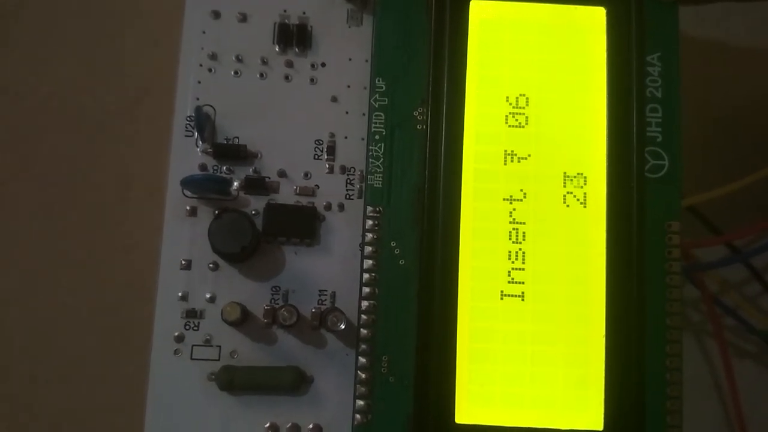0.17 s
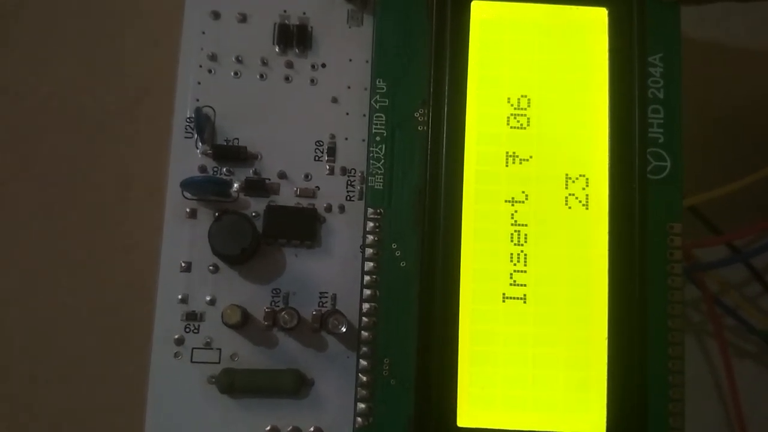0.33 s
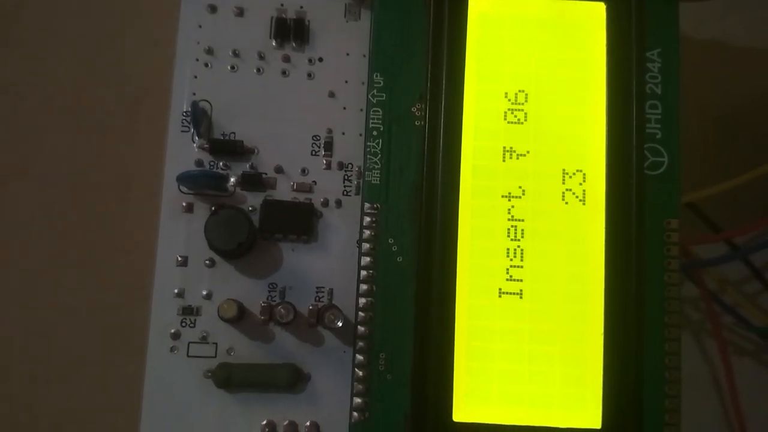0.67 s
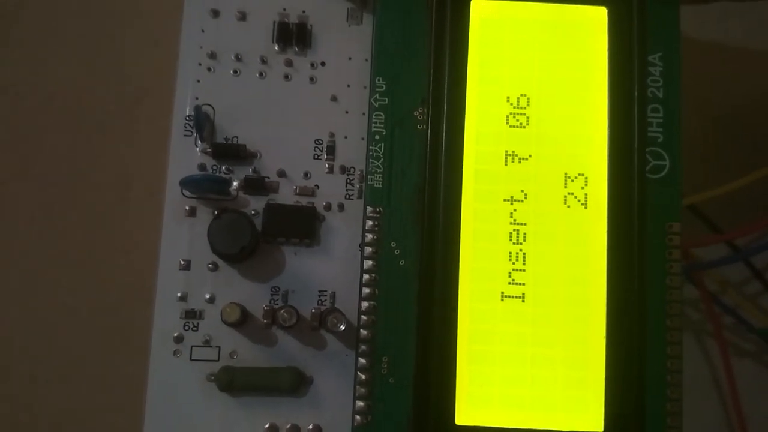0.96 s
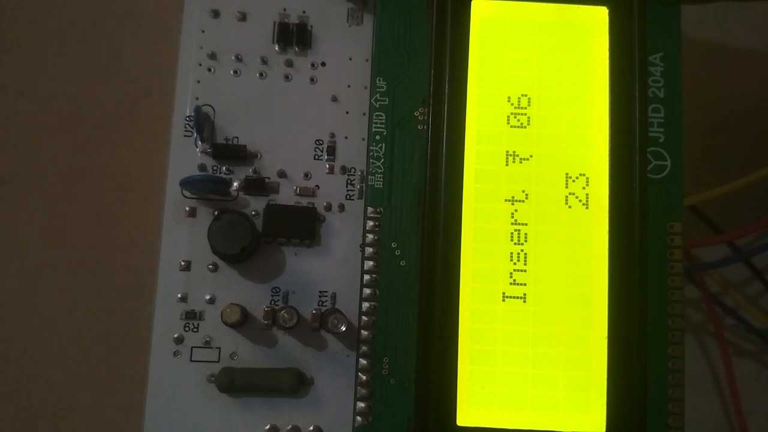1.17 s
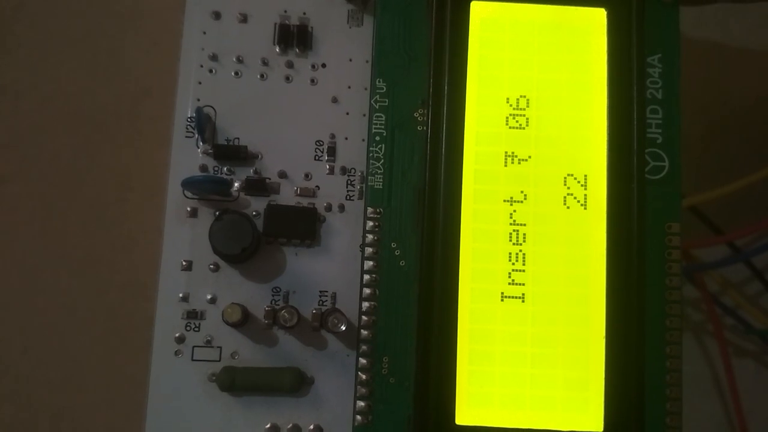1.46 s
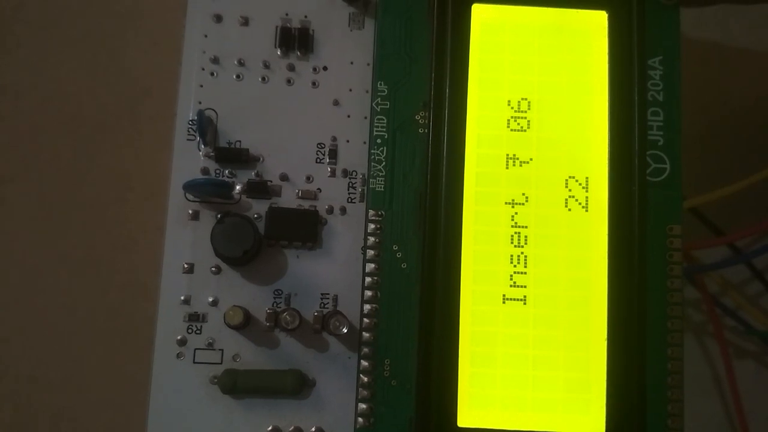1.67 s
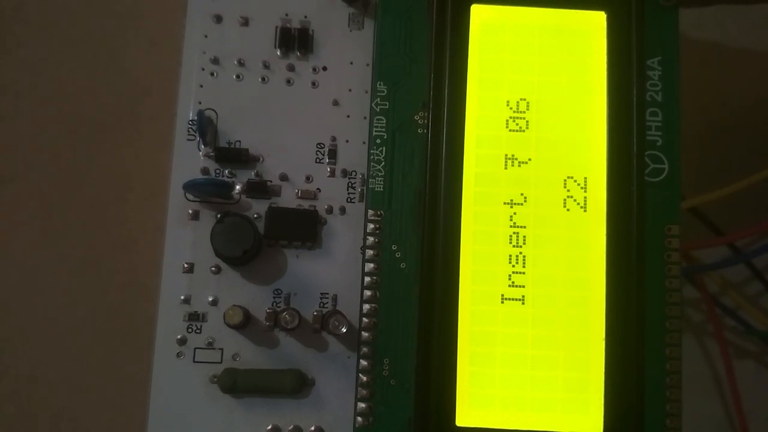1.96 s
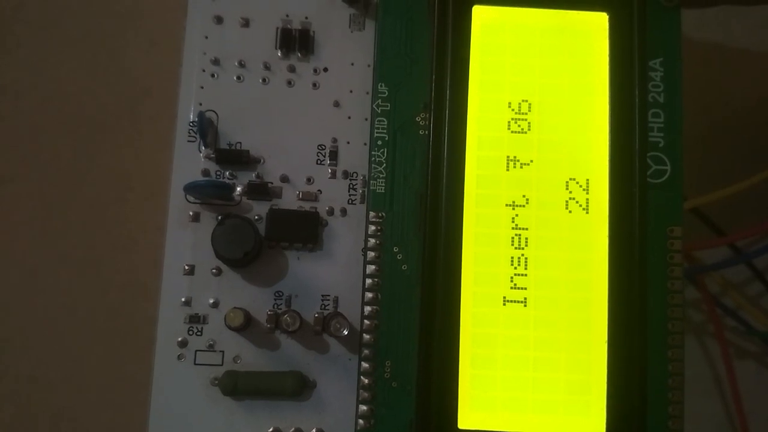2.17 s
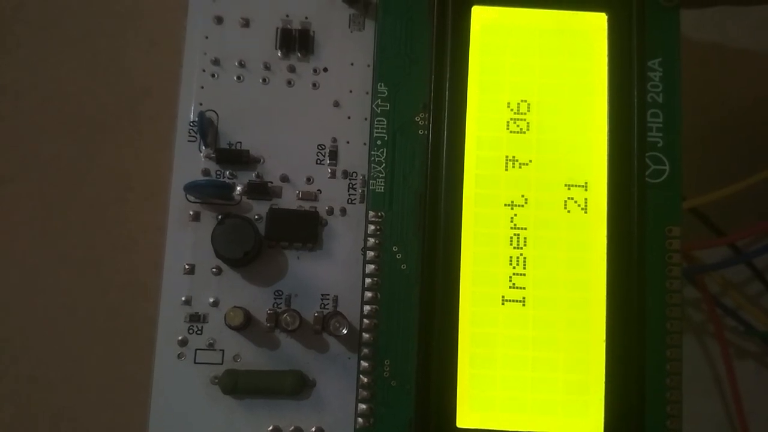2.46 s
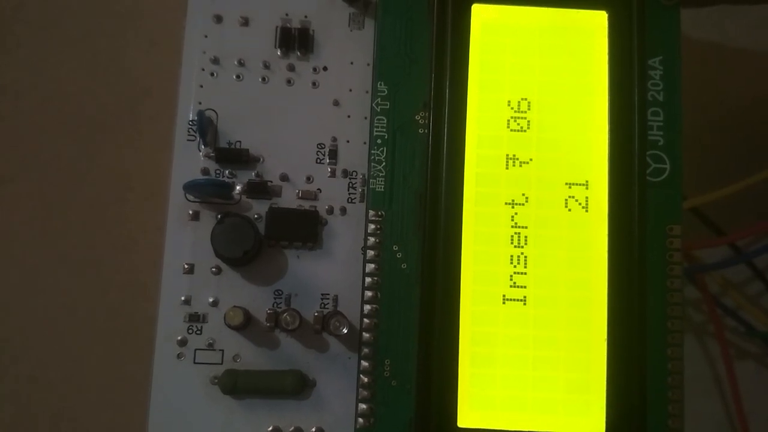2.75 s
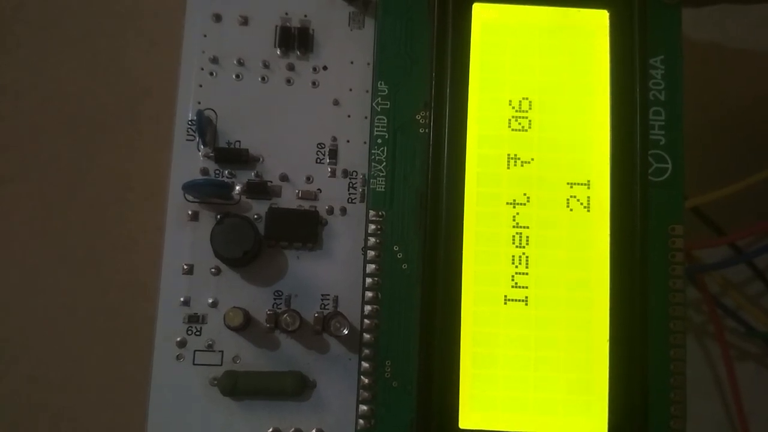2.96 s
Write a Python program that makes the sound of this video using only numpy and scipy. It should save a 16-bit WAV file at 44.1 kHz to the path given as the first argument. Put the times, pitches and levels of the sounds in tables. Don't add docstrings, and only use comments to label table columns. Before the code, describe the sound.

Coin drops through a small metal machine, sparse clicks becoming loud rattling knocks over a faint low hum

```python
import sys
import numpy as np
from scipy import signal
from scipy.io import wavfile
from scipy.ndimage import uniform_filter1d

SR = 44100
rng = np.random.default_rng(int(sys.argv[2]) if len(sys.argv) > 2 else 0)


def unload_wav(signal):
    wavfile.write(
        sys.argv[1],
        SR,
        np.round(np.clip(np.atleast_2d(signal).T, -1, 1) * 32767).astype(np.int16),
    )


def field_ratio(decibels):
    return 10 ** (np.asarray(decibels, dtype=float) / 20)


N = 136710

# f/Hz, level/dB, t60/s
CHUTE_MODES = [(4120, -14.5, 0.0085), (5182, -5, 0.0073), (5643, -9.5, 0.048), (7166, -13, 0.019),
               (8460, -17.5, 0.012)]
# f/Hz, level/dB, t60/s
COIN_MODES = [(8400, -2, .012), (9900, -2, .012), (11100, -1, .014), (12300, -2, .01), (13450, -1, .012),
              (14700, -2, .01)]
# f/Hz, level/dB, t60/s
FLAP_MODES = [(1800, 5, .02), (2650, 1, .025), (3050, 2, .03), (3850, -2, .03), (5050, -7, .025),
              (5350, -4, .03)]
DETUNE = 0.035
CABINET_APART = .3
LEFT_RIGHT = np.array([[1], [-1]])


def evened(x):
    return x / np.sqrt(np.mean(x ** 2) + 1e-20)


def read(points, hz):
    f, value = np.transpose(points)
    return np.interp(np.log(hz + 1), np.log(f + 1), value)


def add(mix, s, sound):
    part = mix[:, round(s * SR):][:, :sound.shape[1]]
    part += sound[:, :part.shape[1]]


def band(x, lo_hz, hi_hz):
    return signal.sosfilt(signal.butter(3, [lo_hz, min(hi_hz, 20000)], "band", fs=SR, output="sos"), x)


def resonate(x, hz, width):
    turn = np.exp(2j * np.pi * np.cumsum(hz) / SR)
    r = np.exp(-np.pi * width / SR)
    return (turn * signal.lfilter([1], np.convolve([1, -r], [1, -r]), x / turn)).real


def air():
    # f/Hz, level/dB
    colour = [(25, -28.5), (50, -10.5), (165, 0.5), (250, -9), (330, -24.5), (1400, -33), (2300, -53),
              (9500, -58.5)]
    # f/Hz, correlation
    likeness = [(60, 0.77), (240, 0.73), (950, 0.12), (3770, 0.16), (15000, -0.043)]
    level_db, patch_db, hiss_top_hz = -54.5, 10, 9900
    frames, hz = N // 256 + 5, np.fft.rfftfreq(1024, 1 / SR)
    a, b, c, d, patches = rng.standard_normal((frames, 513, 5)).T
    patches = uniform_filter1d(patches, size=2, axis=0)
    patches = evened(uniform_filter1d(patches, size=14, axis=1))
    patchy = ((hz > 300) & (hz < 2400))[:, None]
    same = np.clip(read(likeness, hz), -1, 1)[:, None]
    left = a + 1j * b
    right = same * left + np.sqrt(1 - same ** 2) * (c + 1j * d)
    gain_db = read(colour, hz)[:, None] + patch_db * np.clip(patches, -2, 2) * patchy
    gain_db = gain_db - 11.0 * (hz > hiss_top_hz)[:, None]
    z = np.array([left, right]) * field_ratio(gain_db)
    return field_ratio(level_db) * evened(signal.istft(z, nperseg=1024, noverlap=768)[1][:, :N])


def motor():
    # t/s, f/Hz, level/dB
    first_order = [(0.0, 54, -44.5), (0.02, 59.4, -52), (0.25, 51.62, -55), (0.32, 57.73, -98),
                   (0.44, 57.94, -57), (1.28, 55.9, -50.5), (1.76, 56.3, -59), (2.04, 57.4, -50.5),
                   (2.3, 53.23, -48), (2.37, 62.3, -56), (2.46, 59.8, -93), (2.55, 56.54, -68),
                   (2.97, 54.84, -60), (3.1, 58.7, -62)]
    # multiple of the first, width/Hz, level/dB
    higher_orders = [(2, 18, -56.5), (2.95, 12, -54.5), (3.8, 40.6, -56.5), (4.4, 15, -59.5)]
    t = np.arange(N) / SR
    s, hz, db = np.transpose(first_order)
    hz = np.interp(t, s, hz)
    hum = np.sqrt(2) * field_ratio(np.interp(t, s, db)) * np.sin(2 * np.pi * np.cumsum(hz) / SR)
    out = np.array([hum, hum])
    for multiple, width, level_db in higher_orders:
        noise = rng.standard_normal((3, N))
        nearly_mono = noise[0] + 0.018 * noise[1:]
        out = out + field_ratio(level_db) * evened(resonate(nearly_mono, multiple * hz, width))
    return out


def room(x):
    # f/Hz, t60/s
    decay = [(500, 0.36), (1500, 0.38), (4000, 0.34), (8000, 0.31), (15000, 0.27)]
    # f/Hz, level/dB
    tint = [(500, 12), (1500, 1.5), (4000, 1.5), (8000, 0), (15000, 6)]
    gap_s, rise_s = .007, .012
    out = np.zeros((2, N))
    turn = np.arange(N) / SR * 9
    build_up = np.clip((np.arange(SR) / SR - gap_s) / rise_s, 0, 1)
    for k in range(3):
        taps = rng.choice([-1., 1.], (2, SR)) * (rng.random((2, SR)) < .1)
        hz, t, z = signal.stft(taps, SR, nperseg=256)
        z = z * field_ratio(read(tint, hz)[:, None] - 60 * t / read(decay, hz)[:, None])
        tail = signal.istft(z, SR, nperseg=256)[1][:, :SR] * build_up
        tail = tail / np.linalg.norm(taps[0, :2000])
        share = np.sqrt(2 / 3) * np.cos(turn + k * np.pi / 3)
        out += signal.fftconvolve(x[None] * share, tail, axes=1)[:, :N]
    return out


def ring(modes, detune, apart, longest, spot_db=4):
    soft_s = 0.00081
    t = np.arange(9000) / SR
    hz, db, t60 = np.transpose(modes)[..., None]
    luck = rng.standard_normal((3, len(modes), 1))
    phase = 2 * np.pi * hz * (1 + detune * luck[0]) * t
    shape = field_ratio(db + spot_db * luck[1] - 60 * t / np.clip(t60, .004, longest))
    shape = shape * np.minimum(t / soft_s, 1)
    sides = [(shape * np.sin(phase + side * apart * luck[2])).sum(0) for side in (1, -1)]
    return np.array(sides) / np.sqrt(len(modes))


def tick(lo_hz, hi_hz):
    rise_s, fall_s, apart = 0.00032, 0.0042, .7
    t, noise = np.arange(9000) / SR, rng.standard_normal((3, 9000))
    shape = np.minimum(t / rise_s, 1) * np.exp(-t / fall_s)
    return band((noise[0] + apart * noise[1:]) * shape, lo_hz, hi_hz)


def rustle(rise, fall, treble_db, middle_db):
    t = np.arange(12000) / SR
    grains = rng.standard_normal((2, len(t))) * field_ratio(2 * rng.standard_normal(len(t)))
    shape = np.minimum(t / rise, 1) ** 2 * np.exp(-np.maximum(t - rise, 0) / fall)

    def rung(modes):
        body = ring(modes, .01, .6, .035)[:, :900]
        return evened(signal.fftconvolve(grains, body, axes=1)[:, :len(t)])

    treble = evened(band(grains, 10300, 19000)) + 0.33 * rung(COIN_MODES)
    middle = evened(band(grains, 2200, 7200)) + 2 * rung(CHUTE_MODES + FLAP_MODES)
    return shape * (field_ratio(treble_db) * treble + field_ratio(middle_db) * middle)


def strike(touch, cabinet_db, crack_db, coin_db, scale):
    # f/Hz, level/dB, t60/s
    cabinet_modes = [(393.5, -52, .03), (810, -30, .03), (1120, -16.5, 0.0042), (1618, -2.5, 0.054),
                     (1665, 16.5, 0.0082), (2010, 4, 0.048), (2380, -45, .014), (2487, 10, 0.0034),
                     (2932, -3.5, 0.03)]
    # cabinet level/dB, lowest f/Hz
    reach = [(-20, 1400), (-5, 850)]
    longest_s = .018
    lowest_hz = np.interp(cabinet_db, *np.transpose(reach))
    parts = [ring(cabinet_modes, DETUNE, CABINET_APART, longest_s) + 1.0 * tick(1000, 2570),
             ring(CHUTE_MODES, DETUNE, 1, longest_s) + 0.59 * tick(2100, 6460),
             ring(COIN_MODES, DETUNE, 0.72, longest_s) + 2 * tick(7310, 15000)]
    levels_db, pans_db = (cabinet_db, crack_db, coin_db), (-0.23, 2, -1)
    out = 0
    for db, pan_db, part in zip(levels_db, pans_db, parts):
        part = signal.fftconvolve(part[:, :2000], touch[None], axes=1)
        part = band(band(part, lowest_hz, 28000), lowest_hz, 28000)
        out = out + field_ratio(db + pan_db * LEFT_RIGHT) * part / scale(part)
    return out


def roll(length, cabinet_db, crack_db, coin_db):
    touch_share, fade_db, edge = .06, -25.5, 0.13
    u = np.arange(6000) / SR / length
    touch = rng.standard_normal(6000) * (rng.random(6000) < touch_share)
    touch = touch * field_ratio(fade_db * u) * np.clip(np.minimum(u, 1 - u) / edge, 0, 1)
    return strike(touch, cabinet_db, crack_db, coin_db,
                  lambda p: np.linalg.norm(p) / np.sqrt(2 * length * SR))


def knock(cabinet_db, crack_db, coin_db):
    chatter_s = .0011
    touch = rng.standard_normal(400) * (rng.random(400) < .04) * np.exp(-np.arange(400) / SR / chatter_s)
    touch[0] = 1.5
    return strike(touch, cabinet_db + 3.5, crack_db - 1, coin_db + 1, lambda p: abs(p.mean(0)).max())


def ping():
    # f/Hz, level/dB, t60/s
    rest_modes = [(11110, 0, .12), (11290, -8, .16), (11560, -3, .11), (11640, -10, .18), (12740, -26, .1),
                  (14740, -34, .1), (15080, -32, .1), (15710, -36, .1)]
    ring_db, crack_db, pan_db = -18, -22, -2.5
    modes = ring(rest_modes, 0, .2, longest=.2, spot_db=0)
    crack = tick(6070, 8200) + 1.35 * tick(9800, 9900) + .4 * tick(11000, 16500)
    sound = field_ratio(ring_db) * modes / abs(modes).max() + field_ratio(crack_db) * crack
    return sound * field_ratio(pan_db * LEFT_RIGHT)


def scene():
    # t/s, rise/s, fall/s, treble level/dB, middle level/dB
    rustles = [
        (0.031, 0.034, 0.031, -58, -70),
        (0.308, 0.064, 0.023, -56.5, -77.5),
        (0.3266, 0.0017, 0.004, -49, -76),
        (.338, 0.001, 0.0019, -48, -95),
        (0.67, 0.0056, 0.0042, -76.5, -100),
        (0.734, 0.016, 0.035, -76.5, -100),
        (0.782, 0.011, 0.027, -59, -74),
    ]
    # t/s, level/dB
    flap_touches = [
        (1.3708, -48),
        (1.395, -60.5),
        (1.423, -65),
        (1.454, -61.5),
    ]
    # t/s, length/s, cabinet level/dB, crack level/dB, coin level/dB
    rolls = [(1.712, 0.07, -55.5, -41.5, -42), (1.819, 0.032, -43.5, -43, -43.5),
             (2.029, 0.041, -59.5, -66, -57), (2.145, 0.13, -55.5, -57, -53.5),
             (2.207, 0.13, -37.5, -42.5, -41.5), (2.362, 0.16, -47.5, -77.5, -59),
             (2.422, 0.068, -38, -43, -36.5), (2.528, 0.11, -31, -30.5, -25.5),
             (2.704, 0.11, -48, -71, -51.5), (2.765, 0.09, -46, -62, -55)]
    # t/s, cabinet level/dB, crack level/dB, coin level/dB
    knocks = [(1.369, -46.5, -99, -99), (1.396, -53, -99, -99), (1.4536, -56, -99, -99),
              (1.707, -47, -21.5, -20), (1.725, -77, -37, -18.5), (1.8203, -37, -21.5, -51),
              (1.828, -54, -43, -45), (1.831, -26, -54, -47), (1.9617, -66, -42, -53.5),
              (2.0368, -50, -31, -33), (2.099, -27, -26, -35.5), (2.146, -33.5, -74, -42.5),
              (2.1877, -31, -25.5, -46), (2.1901, -34, -34, -50.5), (2.1963, -30, -41.5, -65.5),
              (2.204, -23, -16.5, -18), (2.2054, -15.5, -31.5, -43.5), (2.2128, -31.5, -41.5, -49),
              (2.221, -20.5, -41.5, -33.5), (2.2365, -19.5, -36.5, -39), (2.2467, -38, -50, -51.5),
              (2.2726, -31.5, -43, -45), (2.4024, -31, -55, -50.5), (2.4062, -33, -57, -54.5),
              (2.4074, -35, -55.5, -60), (2.4154, -15, -19.5, -24), (2.4322, -27, -30, -37.5),
              (2.4428, -36, -52, -18), (2.5025, -8, -10.5, -8.5), (2.5051, -9, -24, -21.5),
              (2.5269, -6.5, -16, -5.5), (2.529, -15, -28.5, -10), (2.5435, -38, -29, -26.5),
              (2.6229, -17, -27, -60), (2.691, -17.5, -17.5, -30.5), (2.769, -39, -61, -66.5),
              (2.8242, -32, -37.5, -41)]
    # t/s, level/dB
    thuds = [(2.204, -38.5), (2.224, -47), (2.2365, -40), (2.503, -38.5), (2.5258, -31.5), (2.691, -46.5)]
    # f/Hz, level/dB, t60/s
    floor_modes = [(367, -2.9, 0.033), (415, -2.3, 0.051), (602, 0.95, 0.039), (713, 0.067, 0.081),
                   (796, -0.69, 0.12)]
    room_db, balance_db, fingers_to_room = -3.5, 0.82, .5
    coin = np.zeros((2, N))
    for s, *levels in knocks:
        add(coin, s, knock(*levels))
    for s, *row in rolls:
        add(coin, s, roll(*row))
    for s, db in flap_touches:
        add(coin, s, field_ratio(db) * ring(FLAP_MODES, .015, .5, .08, spot_db=2))
    for s, db in thuds:
        add(coin, s, field_ratio(db) * ring(floor_modes, DETUNE, CABINET_APART, .1))
    coin = np.array([coin[0], np.roll(coin[1], 3)])
    add(coin, 2.8967, ping())
    fingers = np.zeros((2, N))
    for s, *row in rustles:
        add(fingers, s, rustle(*row))
    walls = field_ratio(room_db) * room(coin[0] + fingers_to_room * fingers.mean(0))
    mix = coin + fingers + walls + motor() + air()
    return mix * field_ratio(balance_db / 2 * LEFT_RIGHT)


def starve(x):
    rarity, holes_from_hz, holes_over_db = .95, 1900, -80
    top_hz, top_opens_db = 15800, -27
    hz, t, z = signal.stft(x, SR, nperseg=512)
    luck = evened(uniform_filter1d(rng.standard_normal((52, len(t))), size=13, axis=1))
    luck = np.repeat(luck, 5, axis=0)[:len(hz)]
    hz = hz[:, None]
    holes = (luck > rarity) & (hz > holes_from_hz)
    treble_db = 10 * np.log10((abs(z[:, 90:]) ** 2).sum((0, 1)) + 1e-14)
    loud = treble_db > top_opens_db
    keep = np.where(holes & ~loud & (treble_db > holes_over_db), .015, 1)
    keep = keep * np.where((hz > top_hz) & ~loud, .002, 1) * (hz < 16800)
    return signal.istft(z * keep, SR, nperseg=512)[1][:, :N]


def low_pass(x):
    return signal.sosfilt(signal.butter(12, 16970, fs=SR, output="sos"), x)


def record(dry):
    duck_at_db, duck_share, recover_db_per_s, ceiling = -37, 0.32, 30.5, .84
    power = uniform_filter1d((dry ** 2).mean(0), size=800, origin=399)
    power_db = 10 * np.log10(abs(power) + 1e-12)
    fall = np.arange(N) * recover_db_per_s / SR
    held_db = np.maximum.accumulate(power_db + fall) - fall
    over_db = np.maximum(held_db - duck_at_db, 0)
    ducked = dry / field_ratio(duck_share * uniform_filter1d(over_db, size=1200, origin=599))
    return low_pass(starve(np.clip(ducked, -ceiling, ceiling)))


dry = scene()
out = record(dry)
unload_wav(out)
```